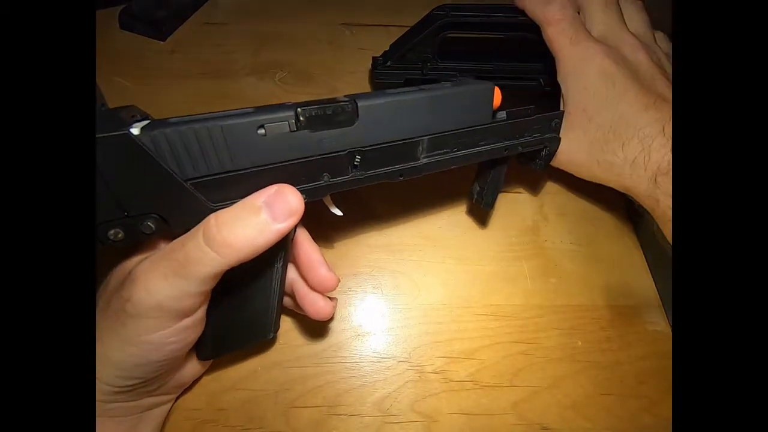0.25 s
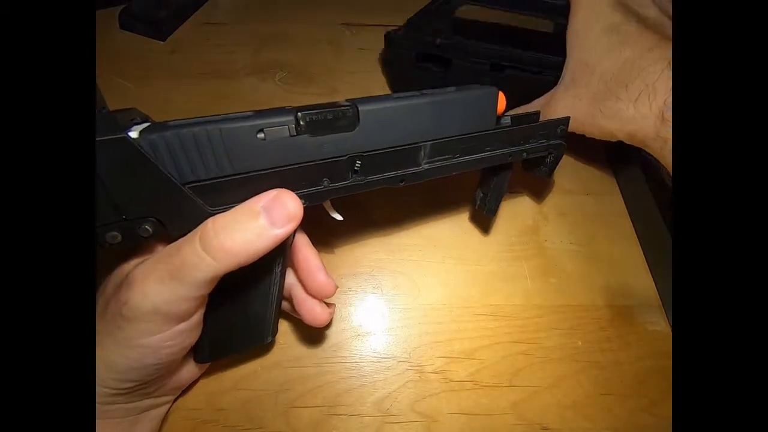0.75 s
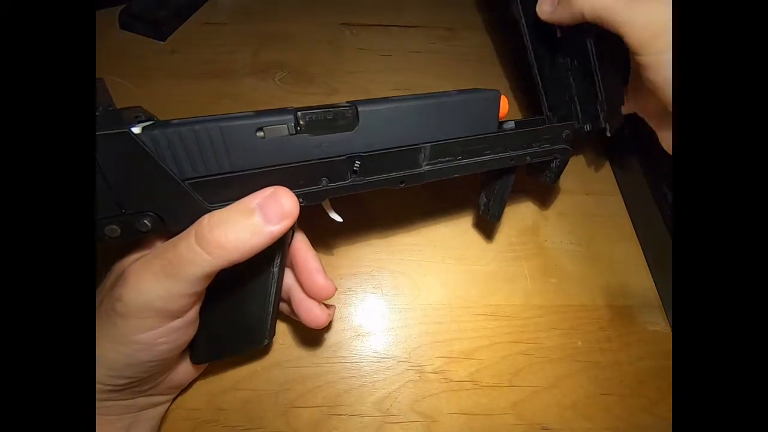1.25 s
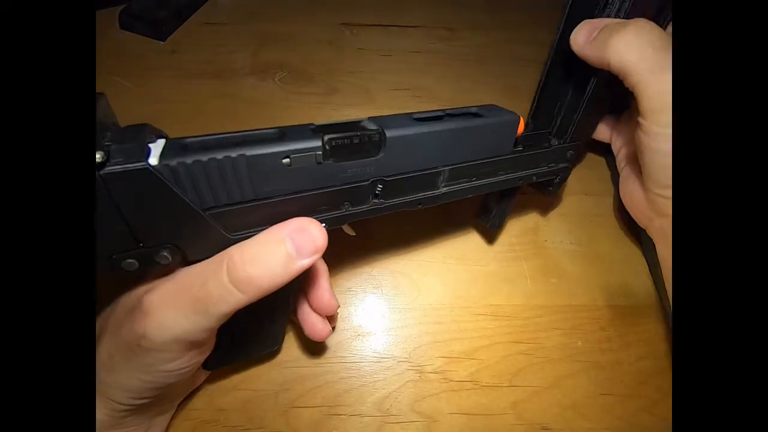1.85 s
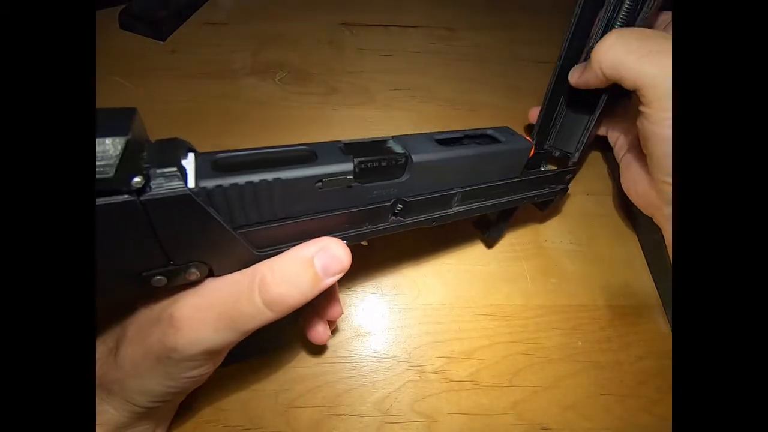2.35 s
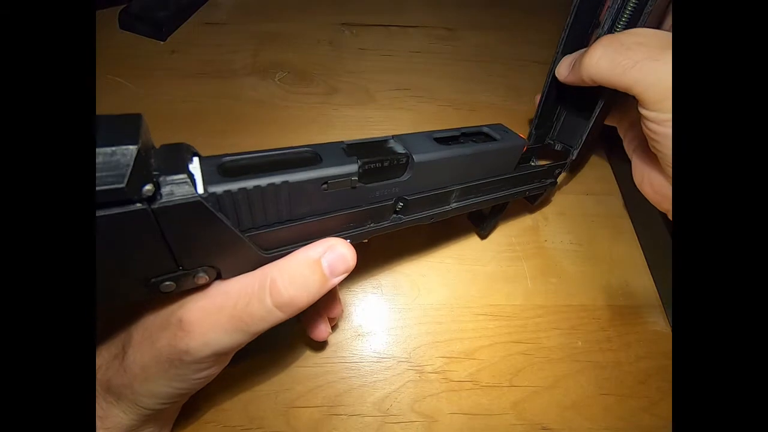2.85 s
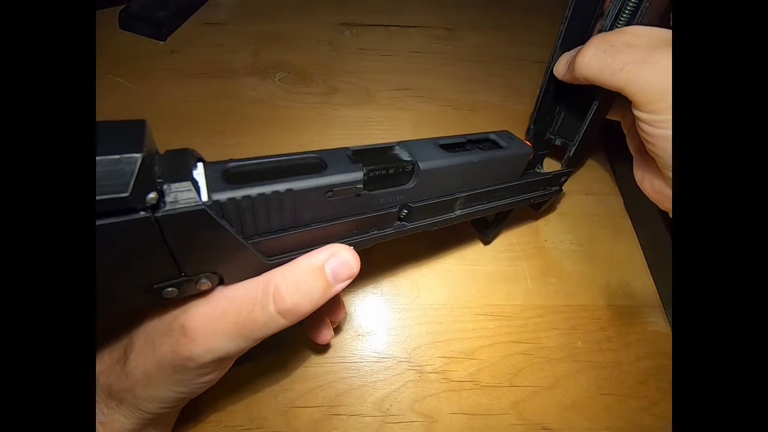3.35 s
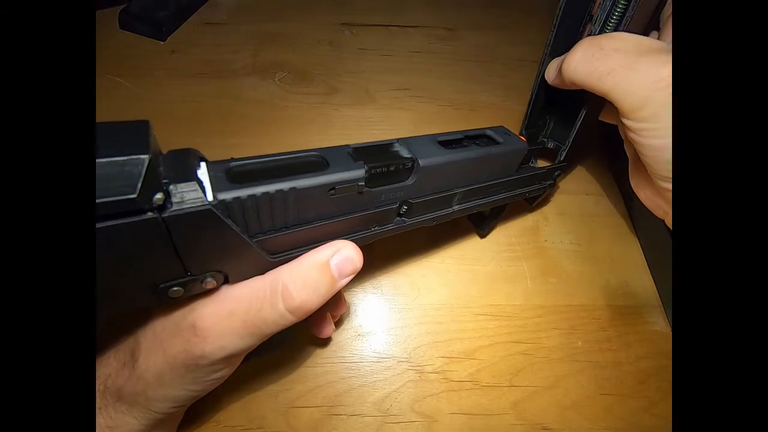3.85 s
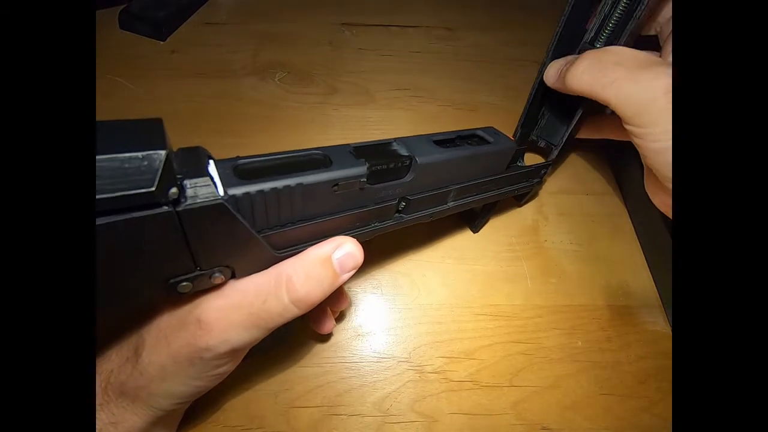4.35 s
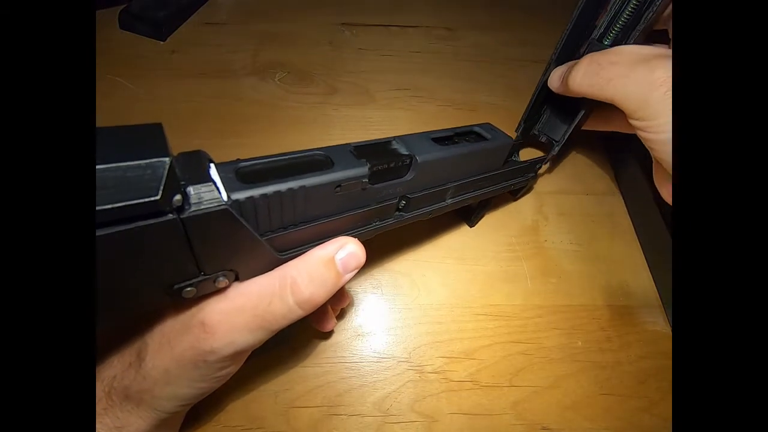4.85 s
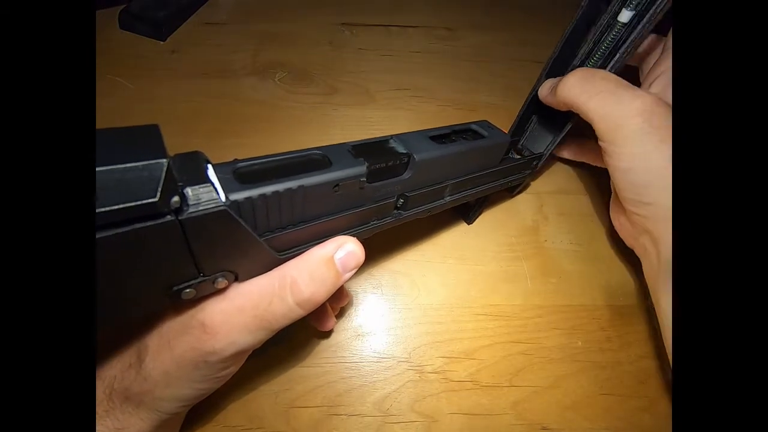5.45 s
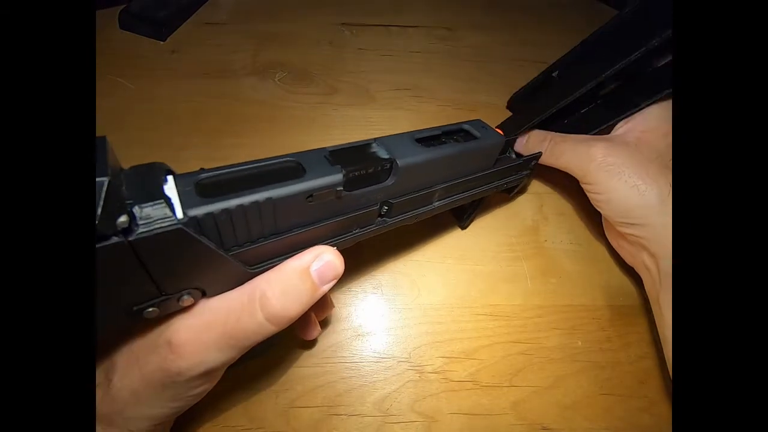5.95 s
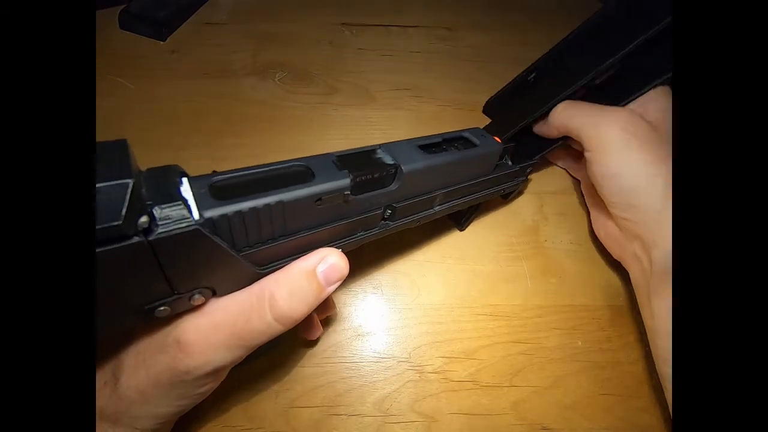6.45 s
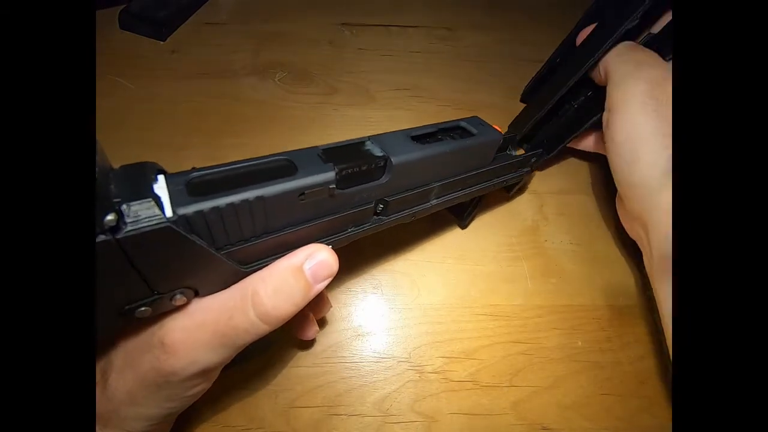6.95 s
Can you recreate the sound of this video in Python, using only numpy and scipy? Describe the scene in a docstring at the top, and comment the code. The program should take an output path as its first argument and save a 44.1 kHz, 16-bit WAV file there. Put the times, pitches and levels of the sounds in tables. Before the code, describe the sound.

Quiet close handling of hard plastic: a piece judders off wood, tiny clicks tick along, and stiff parts snap and knock, lightly booming the tabletop.

```python
"""Toy gun taken apart on a table

A printed plastic toy gun is taken apart by hand over a wooden table, close to a camera that stands on it.
Struck and slipping plastic is modal: damped modes with a noise crack and a noise tail. Fingers are noise friction
through the shell; knocks are force pulses into the table's modes. Squeal, drone, grip rumble and room are
shaped noise."""
import sys
import numpy as np
from scipy import signal
from scipy.fft import rfft, irfft, next_fast_len
from scipy.io import wavfile

SR = 44100
rng = np.random.default_rng(int(sys.argv[2]) if len(sys.argv) > 2 else 0)


def dump(signal):
    """Clip the signal to [-1, 1] and save it as 16-bit WAV at the path in sys.argv[1]."""
    limited = np.clip(np.atleast_2d(signal).T, -1, 1)
    pcm = np.round(limited * 32767).astype(np.int16)
    wavfile.write(sys.argv[1], SR, pcm)


N = 317961

# hollow plastic shell modes: pitch_hz, width_hz, drive_db (times width, before normalising)
SHELL = [(501.5, 25, 12.5), (1040, 260, -19), (1875, 43, -9), (2301, 40, -6.5), (2584, 86, -8.5),
         (2864, 60, -9.5), (3020, 35, -6.5), (3257, 43, -10), (3560, 39, -9), (3710, 99, -11),
         (4400, 47, -16.5), (4784, 43, -7), (5160, 21, -3), (5400, 19, -31), (5600, 90, -7.5),
         (5810, 25, -24.5), (6075, 28, -17.5), (6190, 42, -4.5), (7650, 330, -19.5), (8250, 52, -21)]
# colour of plastic on plastic or wood: pitch_hz, density_db (per Hz, relative)
PLASTIC = [(120, -15.5), (200, 5), (570, -2.5), (748, -2), (1150, -8.5), (1490, -14.5), (2250, -13.5),
           (3350, -21.5), (3870, -13.5), (4550, -19), (6190, -12), (8880, -16), (9900, -22), (14200, -44.5),
           (15000, -48.5)]
# ranges of a contact's body, clack and snap: low_hz, high_hz
BANDS_HZ = [(300, 1200), (1200, 4200), (4200, 14000)]
CLICK_S = .012   # first moments of a click, over which its levels hold


def from_db(db):
    """Decibels to gain."""
    return 10 ** (np.asarray(db) / 20)


def rms(x):
    """Root mean square."""
    return np.sqrt(np.mean(x ** 2) + 1e-20)


def seconds(length_s):
    """Sample times of a short stretch."""
    return np.arange(int(length_s * SR)) / SR


def add(track, sound, start_s):
    """Mix a sound into a track from start_s on."""
    at = int(round(start_s * SR))
    track[..., at:at + sound.shape[-1]] += sound[..., :N - at]


def cut(x, hz, kind, order=3):
    """Butterworth filter."""
    sos = signal.butter(order, hz, kind, fs=SR, output="sos")
    return signal.sosfilt(sos, x)


def peak(x, hz, width_hz, gain_db):
    """Raise or lower one resonant band."""
    hz = np.clip(hz, 20, .45 * SR)
    b, a = signal.iirpeak(hz, hz / width_hz, fs=SR)
    return x + (from_db(gain_db) - 1) * signal.lfilter(b, a, x)


def fade(t, t60_s):
    """Free decay, 60 dB down after t60_s."""
    return np.exp(-np.log(1000) * t / t60_s)


def swell(start_s, end_s, rise_db_per_s, fall_db_per_s):
    """Attack, hold and release in dB: 0 from start to end, falling to -120 on both sides."""
    t = np.arange(N) / SR
    before = rise_db_per_s * np.maximum(start_s - t, 0)
    after = fall_db_per_s * np.maximum(t - end_s, 0)
    return np.maximum(-before - after, -120)


def coloured(spectrum, size):
    """Two unrelated noises of a given colour, joint rms 1."""
    hz, density_db = np.transpose(spectrum)
    padded = next_fast_len(size)
    bins_hz = np.maximum(np.arange(padded // 2 + 1) * SR / padded, 1)
    gain = from_db(np.interp(np.log(bins_hz), np.log(hz), density_db))
    gain = gain * (bins_hz > hz[0] / 2)
    noise = irfft(rfft(rng.standard_normal((2, padded))) * gain, padded)[:, :size]
    return noise / rms(noise)


def stereo(pair, side_db):
    """The first signal is shared by both ears, the second sets them apart."""
    return pair[0] + from_db(side_db) * pair[1] * np.array([[1], [-1]])


def narrowed(x):
    """Draw the bass to the middle: close microphones hear the same below 420 Hz."""
    middle, side = (x[0] + x[1]) / 2, (x[0] - x[1]) / 2
    return stereo([middle, cut(side, 420, "high", order=2)], side_db=0.5)


def body(modes, colour, crack_db, crack_t60_s, held_t60_s, tail_db, tail_t60_s, side_db):
    """Answer of a part to one touch: a crack of dense modes, the main modes damped by the hand, then the room."""
    t = seconds(.17)
    hz, width_hz, drive_db = np.transpose(modes)[:, :, None]
    # each contact point feeds the modes differently
    scatter_db = 2.5 * rng.standard_normal(hz.shape)
    strength = width_hz * from_db(drive_db + scatter_db)
    phase = 2 * np.pi * rng.random((2, len(hz), 1))
    waves = np.sin((2 * np.pi * hz * t + phase).astype(np.float32))
    rings = (strength * np.exp(-np.pi * width_hz * t) * waves).sum(axis=1)
    rings = rings * fade(t, held_t60_s)   # hand damping on top of each mode's own
    crack = coloured(colour, len(t)) * fade(t, crack_t60_s)
    tail = coloured(colour, len(t)) * fade(t, tail_t60_s)
    near = rings / rms(rings) + from_db(crack_db) * crack / rms(crack)
    return stereo(near, side_db) + from_db(tail_db) * stereo(tail / rms(tail), side_db=-5.0)


def voiced(sound, levels_db, length_s):
    """Set how much body, clack and snap a contact has over its first moments."""
    sound = cut(sound, 150, "high", order=2)   # little sound below 150 Hz
    low = cut(sound, BANDS_HZ[0][1], "low")
    middle = -cut(sound, BANDS_HZ[1], "band")
    high = cut(sound, BANDS_HZ[2][0], "high")
    out = 0
    for part, band_hz, db in zip([low, middle, high], BANDS_HZ, levels_db):
        heard = cut(part.mean(axis=0), band_hz, "band")[:int(length_s * SR)]
        out = out + part * from_db(db) / rms(heard)
    return out


def slips(start_s, hardest_s, end_s, per_s, swell_db):
    """Stick and slip over print ridges: unevenly spaced tiny blows that swell and let go."""
    t = start_s + seconds(max(end_s - start_s, CLICK_S))
    count = 400
    gaps_s = rng.gamma(2, 1 / (2 * per_s), count)
    at = (np.cumsum(gaps_s) * SR).astype(int)
    inside = at < len(t)
    blows = np.zeros(len(t))
    blows[at[inside]] = rng.choice([-1, 1], count)[inside]
    effort_db = np.interp(t, [start_s, hardest_s, end_s], [-swell_db, 0, -swell_db])
    return blows[None] * from_db(effort_db)


def clicks(seating_s):
    """Single sharp touches: the piece that is hit rings above the shell, and takes a moment to seat."""
    # plastic touching plastic: start_s, body_db, clack_db, snap_db, piece_ring_hz
    touches = [(2.636, -62, -53, -60, 2210), (2.8721, -59.5, -51.5, -55.5, 1650),
               (3.017, -59.5, -59, -61, 1690), (3.033, -62, -61.5, -77, 1230),
               (3.12, -65, -70.5, -85, 1825), (3.4018, -55, -64, -68.5, 1500), (3.492, -66, -69, -72, 1500),
               (3.584, -55, -48.5, -57, 3950), (3.6588, -60.5, -62, -75, 2990),
               (3.744, -60, -58, -68.5, 2570), (4.072, -59.5, -63.5, -86, 1710),
               (4.1075, -74, -53.5, -57.5, 2700), (4.135, -59, -47, -70, 2186),
               (4.319, -57, -54, -59.5, 2370), (4.36, -65, -65, -73, 3950),
               (4.443, -65.5, -54.5, -66, 2350), (4.6165, -64, -57.5, -82, 1820),
               (4.636, -55, -57, -82, 1320), (4.718, -67, -64.5, -89, 1770), (4.831, -63, -55, -74, 1860),
               (5.0227, -49, -48.5, -66.5, 2170), (5.115, -91, -64, -76, 1630),
               (5.1505, -54, -56.5, -63, 2206), (5.189, -58.5, -67, -86, 2220),
               (5.409, -50.5, -47.5, -60, 1880), (5.435, -45.5, -50, -64, 1840),
               (5.4728, -62, -38, -44, 2820), (5.481, -48.5, -41, -51, 3200),
               (5.502, -46.5, -48, -61, 2270), (5.521, -50, -50, -63, 1900), (5.691, -31, -43.5, -52, 1570),
               (6.112, -48, -42.5, -61, 2260), (6.177, -52, -52.5, -73, 1934),
               (6.2687, -32, -46, -57, 2120), (6.4283, -51, -59.5, -69, 2660),
               (6.439, -41.5, -61, -67, 2670), (6.494, -51, -50.5, -74, 1410),
               (6.519, -61, -53.5, -69, 3080), (6.632, -42, -44.5, -65, 2500),
               (6.727, -67, -54.5, -59, 2970), (6.8011, -40.5, -33.5, -43, 3430),
               (6.9069, -56, -51.5, -41.5, 4450), (6.918, -63, -54, -55, 7000),
               (7.0086, -54.5, -66, -67, 2110), (7.1563, -71, -74, -44.5, 5980),
               (7.188, -80, -62, -40.5, 6200)]
    out = np.zeros((2, N))
    for start_s, *levels_db, ring_hz in touches:
        hit = body(SHELL, PLASTIC, crack_db=3, crack_t60_s=0.029, held_t60_s=0.29,
                   tail_db=2, tail_t60_s=0.14, side_db=-13.0)
        hit = hit * (1 - np.exp(-np.arange(hit.shape[1]) / SR / seating_s))
        hit = peak(hit, ring_hz, width_hz=170, gain_db=9.5)
        add(out, voiced(hit, levels_db, CLICK_S), start_s)
    return out


def scrapes(count=4):
    """Tight parts slip along each other at several points and rattle the shell."""
    # parts slipping: start_s, hardest_s, end_s, body_db, clack_db, snap_db, piece_ring_hz
    part_slips = [(2.614, 2.632, 2.655, -72, -65, -59.5, 2370),
                  (4.236, 4.265, 4.292, -51, -42.5, -50.5, 1860),
                  (4.836, 4.857, 4.875, -61.5, -53, -63, 1840),
                  (6.554, 6.562, 6.57, -38, -30.5, -47.5, 2840),
                  (6.57, 6.568, 6.612, -37, -28, -41.5, 2483), (7.144, 7.152, 7.178, -86, -59.5, -47, 6200),
                  (7.175, 7.19, 7.21, -79, -53.5, -71, 6100)]
    out = np.zeros((2, N))
    for start_s, hardest_s, end_s, *levels_db, ring_hz in part_slips:
        sound = 0
        for _ in range(count):
            shell = body(SHELL, PLASTIC, crack_db=2.0, crack_t60_s=0.066, held_t60_s=1.0,
                         tail_db=-7.5, tail_t60_s=0.13, side_db=-12.0)
            blows = slips(start_s, hardest_s, end_s, per_s=360, swell_db=23.5)
            sound = sound + signal.fftconvolve(shell, blows)
        sound = peak(sound, ring_hz, width_hz=190, gain_db=7)
        add(out, voiced(sound, levels_db, end_s - start_s), start_s)
    return out


def drags(count=5):
    """The stock judders over the wood on several edges as it is picked up."""
    # stock dragged on wood: start_s, hardest_s, end_s, body_db, clack_db, snap_db, piece_ring_hz
    stock_drags = [(0.334, 0.339, 0.38, -71, -71, -79.5, 2320), (0.372, 0.407, 0.45, -51.5, -51, -71, 1860),
                   (0.423, 0.425, 0.52, -53.5, -81, -88, 1890),
                   (0.7, 0.732, 0.765, -27.5, -33.5, -52.5, 1644),
                   (0.786, 0.788, 0.83, -46, -47, -74, 1790)]
    # modes of the stock resting on the table: pitch_hz, width_hz, drive_db (times width, before normalising)
    stock_modes = [(198, 30, -1.5), (245, 26, -9), (556, 123, 1), (579, 60, -6.5), (870, 85, 6),
                   (1009, 35, -8.5), (1460, 28, -4), (1662, 19, -1), (1880, 120, -12), (2560, 80, -14.5),
                   (3180, 770, -18.5)]
    out = np.zeros((2, N))
    for start_s, hardest_s, end_s, *levels_db, ring_hz in stock_drags:
        sound = 0
        for _ in range(count):
            stock = body(stock_modes, PLASTIC, crack_db=-6, crack_t60_s=.02, held_t60_s=0.36,
                         tail_db=-12, tail_t60_s=0.079, side_db=-10)
            blows = slips(start_s, hardest_s, end_s, per_s=450, swell_db=20.5)
            sound = sound + signal.fftconvolve(stock, blows)
        sound = peak(sound, ring_hz, width_hz=220, gain_db=8)
        sound = cut(sound, 10080, "low", order=2)   # wood is a soft partner
        add(out, voiced(sound, levels_db, end_s - start_s), start_s)
    return out


def squeal():
    """Friction keeps one narrow high mode of the sliding stock ringing."""
    # thin squeal: time_s, level_db
    squeal_curve = [(0.51, -90), (0.54, -70), (0.62, -78), (0.66, -65), (0.70, -102)]
    centre_hz, width_hz = 5730, 95
    t = np.arange(N) / SR
    time_s, level_db = np.transpose(squeal_curve)
    band_hz = [centre_hz - width_hz / 2, centre_hz + width_hz / 2]
    tone = cut(rng.standard_normal((2, N)), band_hz, "band", order=2)
    sliding = (t > time_s[0]) & (t < time_s[-1])
    gain = sliding * from_db(np.interp(t, time_s, level_db))
    return gain * stereo(tone / rms(tone), side_db=-13)


def stroke_levels():
    """Level of rasp and hiss in dB: the strongest stroke of the moment, or else the holding fingers."""
    # light strokes over ribbed plastic: start_s, hardest_s, end_s, rasp_db, hiss_db
    strokes = [(0.357, 0.44, 0.6, -70, -71), (0.534, 0.7, 0.79, -64, -61),
               (0.80, 0.832, 0.88, -66.5, -71.5), (0.924, 0.97, 0.99, -78, -79.5),
               (1.092, 1.126, 1.18, -74, -64), (1.433, 1.584, 1.60, -81, -73),
               (2.047, 2.075, 2.11, -76, -71.5), (2.155, 2.171, 2.18, -78, -69.5),
               (2.203, 2.29, 2.314, -74.5, -67.5), (2.446, 2.546, 2.5, -70, -68.5),
               (2.529, 2.623, 2.616, -67, -59.5), (3.33, 3.352, 3.6, -78.5, -78.5),
               (3.655, 3.72, 3.89, -74.5, -77.5), (4.047, 4.07, 4.26, -72, -70),
               (4.106, 4.143, 4.23, -66, -65), (4.388, 4.435, 4.48, -63, -67.5),
               (4.51, 4.56, 4.59, -57.5, -53), (4.63, 4.67, 4.71, -66.5, -63),
               (4.75, 4.808, 4.96, -73.5, -78.5), (5.05, 5.151, 5.6, -79.5, -79),
               (5.382, 5.45, 5.56, -53, -63.5), (5.565, 5.57, 5.72, -62.5, -61),
               (5.81, 5.875, 5.95, -49.5, -50), (6.0, 6.054, 6.093, -46, -49.5),
               (6.192, 6.273, 6.5, -68, -70), (6.424, 6.463, 6.64, -57, -57.5),
               (6.65, 6.738, 6.735, -55.5, -52.5), (6.83, 6.905, 6.95, -59.5, -53),
               (7.102, 7.127, 7.13, -66.5, -62.5)]
    swell_db, ease_db = 8.5, 8   # depth of the arch before and after the hardest moment
    bite_db_per_s, release_db_per_s = 698.5, 300
    t = np.arange(N) / SR
    # with the stock in hand, the holding fingers never quite stop rubbing
    held_db = swell(0.33, N / SR, bite_db_per_s, release_db_per_s)
    rasp_level_db, hiss_level_db = -90.5 + held_db, -84 + held_db
    for start_s, hardest_s, end_s, rasp_db, hiss_db in strokes:
        away = np.interp(t, [start_s, hardest_s, end_s], [-1, 0, 1])
        effort_db = -np.where(away < 0, swell_db, ease_db) * away ** 2
        effort_db = effort_db + swell(start_s, end_s, bite_db_per_s, release_db_per_s)
        rasp_level_db = np.maximum(rasp_level_db, rasp_db + effort_db)
        hiss_level_db = np.maximum(hiss_level_db, hiss_db + effort_db)
    return rasp_level_db, hiss_level_db


def rubbing(grain_db, grain_hz, catch_db, catch_hz, split_hz, size=4096):
    """Light friction catches and lets go; its fine grains sound through the shell as a rasp with a hiss above it."""
    # colour of finger friction: pitch_hz, density_db (per Hz, relative)
    skin = [(180, -36), (300, -11.5), (383, 1.5), (616, -10.5), (691, -22), (828, -6), (1330, -16.5),
            (1540, -8.5), (1970, -11), (3220, -10), (4390, -19.5), (7790, -16.5), (10300, -26.5),
            (14000, -52), (15000, -47)]
    snags_per_s, snag_db = 70, 24   # catches on a print ridge; largest size against the fine grain
    grain = cut(rng.standard_normal(N), grain_hz, "low", order=2)
    catching = cut(rng.standard_normal(N), catch_hz, "low", order=2)
    force_db = grain_db * grain / rms(grain) + catch_db * catching / rms(catching)
    snags = (rng.random(N) < snags_per_s / SR) * rng.uniform(-1, 1, N)
    force = rng.standard_normal(N) * from_db(force_db) + from_db(snag_db) * snags
    friction, blend = np.zeros((2, N)), np.sqrt(np.hanning(2 * size))
    # the contact point wanders, so the shell answers a little differently from moment to moment
    for at in range(0, N - size, size):
        shell = body(SHELL, skin, crack_db=15.0, crack_t60_s=0.044, held_t60_s=0.061,
                     tail_db=-3, tail_t60_s=0.19, side_db=-8.0)
        stretch = force[at:at + 2 * size]
        stretch = stretch * blend[:len(stretch)]
        add(friction, signal.fftconvolve(shell, stretch[None]), at / SR)
    rasp, hiss = cut(friction, split_hz, "low"), cut(friction, split_hz, "high")
    rasp = rasp / rms(cut(rasp, BANDS_HZ[1], "band"))   # level counts in the clack range
    hiss = hiss / rms(hiss)
    rasp_db, hiss_db = stroke_levels()
    return rasp * from_db(rasp_db) + hiss * from_db(hiss_db)


def push(contact_s):
    """Half-sine force of unit impulse; the longer the contact, the deeper the boom."""
    force = np.sin(np.pi * seconds(contact_s) / contact_s)
    return force / force.sum()


def table(stiff_hz, apart_hz):
    """A part lands edge first, then with its weight, and rebounds softly; the table top booms."""
    # knocks reaching the table: start_s, push_db, contact_s, edge_db (first touch against the push)
    knocks = [(5.696, -16.5, 0.0024, -11.5), (6.2741, -21.5, 0.0025, -16.5), (6.443, -32.5, 0.0021, -15),
              (6.465, -25, 0.0075, -11), (6.493, -30, 0.0038, -25), (6.56, -25, 0.0023, -7.5),
              (6.638, -30, 0.0067, -10), (6.705, -35, 0.0018, -12), (6.803, -33.5, 0.0017, -24),
              (6.854, -30, 0.0057, -30), (7.014, -32, 0.0034, -21.5), (7.030, -29.5, 0.0054, -27),
              (7.147, -31, 0.0056, -24), (7.191, -34.5, 0.0061, -28)]
    # modes of the table: pitch_hz, level_db, t60_s
    table_modes = [(112.5, 4, 0.33), (156, -4.5, 0.16), (208, 3, 0.055), (235, -9.5, 0.1),
                   (377.4, -1.5, 0.077), (519, -4.5, 0.068), (613, 4.5, 0.085), (755, -2.5, 0.064),
                   (877, -3, .06), (892, -3, .05), (978, 1, .05)]
    edge_lead_s, edge_contact_share = 0.00511, 0.26
    rebound_s, rebound_db, rebound_contact_share = 0.0156, -22.5, 1.3
    force, t = np.zeros(N), seconds(.6)
    for start_s, push_db, contact_s, edge_db in knocks:
        edge = from_db(push_db + edge_db) * push(contact_s * edge_contact_share)
        weight = from_db(push_db) * push(contact_s)
        rebound = from_db(push_db + rebound_db) * push(contact_s * rebound_contact_share)
        add(force, edge, start_s - edge_lead_s)
        add(force, weight, start_s)
        add(force, rebound, start_s + rebound_s)
    boom = 0
    for k, (hz, level_db, t60_s) in enumerate(table_modes):
        # the higher the mode, the more its phase differs between the ears
        phase = (-1) ** k * hz / apart_hz * np.array([[1], [-1]])
        ring = fade(t, t60_s) * np.sin(2 * np.pi * hz * t + phase)
        boom = boom + from_db(level_db) * ring
    sound = signal.fftconvolve(force[None], boom)[:, :N]
    return cut(sound, stiff_hz, "high", order=2)   # the boom carries no deep sub-bass


def pressing(rows):
    """Gain that comes on with the hand's weight, holds and relaxes; the strongest row counts."""
    levels_db = [db + swell(start_s, end_s, rise_db_per_s=450.5, fall_db_per_s=223.5)
                 for start_s, end_s, db in rows]
    return from_db(np.max(levels_db, axis=0))


def drone():
    """Sliding on the wood keeps the hollow stock's lowest modes sounding: band noise."""
    # stock sliding on wood: start_s, end_s, level_db
    slides = [(0.41, 0.46, -43), (0.49, 0.68, -53), (0.73, 0.78, -41)]
    hum = cut(rng.standard_normal((2, N)), [167, 245], "band", order=2)
    return pressing(slides) * stereo(hum / rms(hum), side_db=-17)


def handling():
    """The hands rumble through the table while they shift their grip: coloured noise."""
    # hand shifting its weight on the gun: start_s, end_s, level_db
    grips = [(0.37, 0.42, -39.5), (0.64, 0.806, -51), (4.17, 4.2, -54), (4.643, 4.663, -46),
             (5.165, 5.22, -48.5), (5.394, 5.534, -50.5), (5.668, 5.9, -43), (6.035, 6.09, -32.5),
             (6.128, 6.23, -40), (6.28, 6.336, -37), (6.46, 6.62, -39.5), (6.65, 6.718, -34),
             (6.826, 6.917, -40.5), (7.06, 7.17, -43.5)]
    # colour of the rumble: pitch_hz, density_db (per Hz, relative)
    rumble = [(26, -36), (45, -18.5), (86, 2), (124, 5), (141, 2), (299, -19), (378, -13.5), (442, -31),
              (496, -25.5), (619, -22.5), (686, -54.5), (834, -30), (1000, -40.5), (1300, -56.5),
              (2200, -120)]
    return pressing(grips) * stereo(coloured(rumble, N), side_db=-26.0)


def room_tone():
    """Steady coloured noise: the room's rumble is alike in both ears, its hiss is not."""
    # colour of the quiet room: pitch_hz, density_db (per Hz, relative)
    room_colour = [(12, -46.5), (20, -13), (64, 1), (84, -16), (189, -10.5), (242, -16), (263, -25),
                   (302, -22), (497, -35), (540, -41), (713, -31), (1240, -43), (1780, -50), (3460, -57),
                   (15000, -68.5)]
    shared, apart = from_db(-53.5) * coloured(room_colour, N)
    return stereo([shared, cut(apart, 700, "high", order=1)], side_db=4.5)


def scene():
    """Plastic, table and room together; the plastic's treble leans to the left."""
    rub = rubbing(grain_db=2.0, grain_hz=510, catch_db=0.5, catch_hz=70.1, split_hz=2940)
    plastic = narrowed(clicks(seating_s=0.00061) + scrapes() + drags() + squeal() + rub)
    lean = 0.3 * cut(plastic, 6500, "high", order=1) * np.array([[1], [-1]])
    knocking = narrowed(table(stiff_hz=73, apart_hz=1150))
    return plastic + lean + knocking + drone() + handling() + room_tone()


def record(dry):
    """The camera's housing colours the treble; the deepest bass is thinned and the top is cut."""
    # housing over the microphones: pitch_hz, width_hz, gain_db
    housing = [(4450, 370, 1.5), (8530, 540, -13), (10000, 1400, 2), (12000, 1200, -7)]
    for hz, width_hz, gain_db in housing:
        dry = peak(dry, hz, width_hz, gain_db)
    dry = cut(dry, 22, "high", order=2)
    top_cut = signal.cheby2(14, 70, 16000, fs=SR, output="sos")   # order, stopband dB, stopband edge Hz
    return signal.sosfilt(top_cut, dry)


dry = scene()
out = record(dry)
dump(out)
```